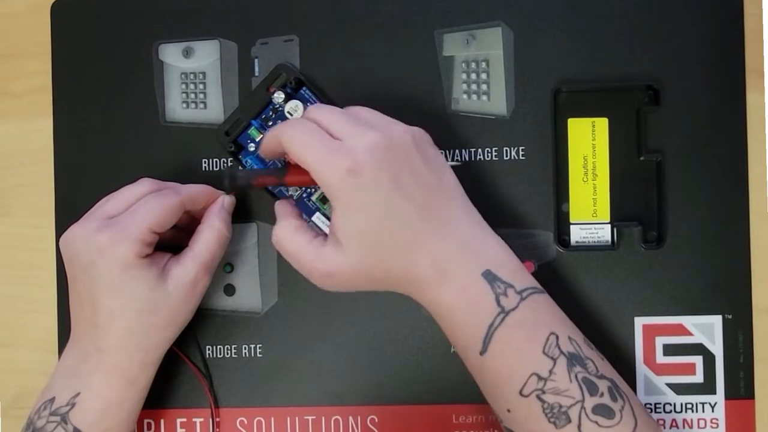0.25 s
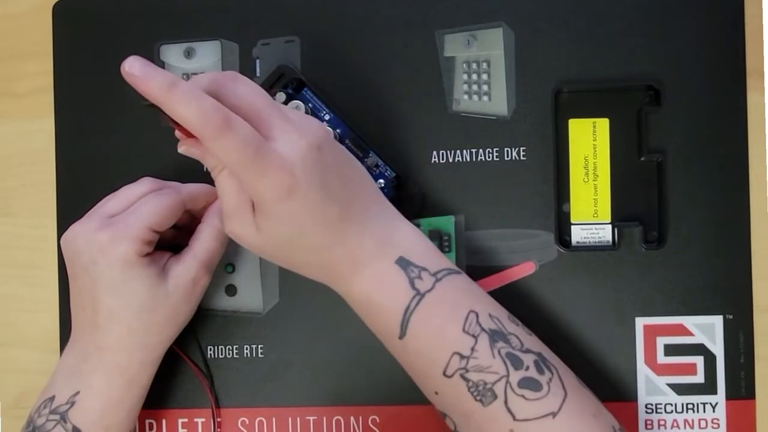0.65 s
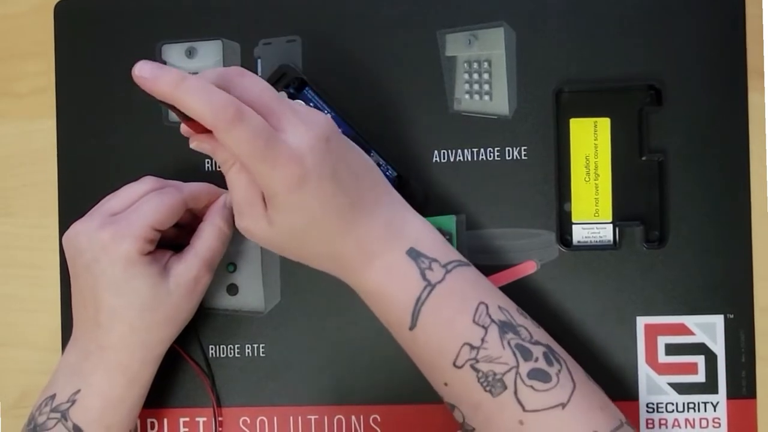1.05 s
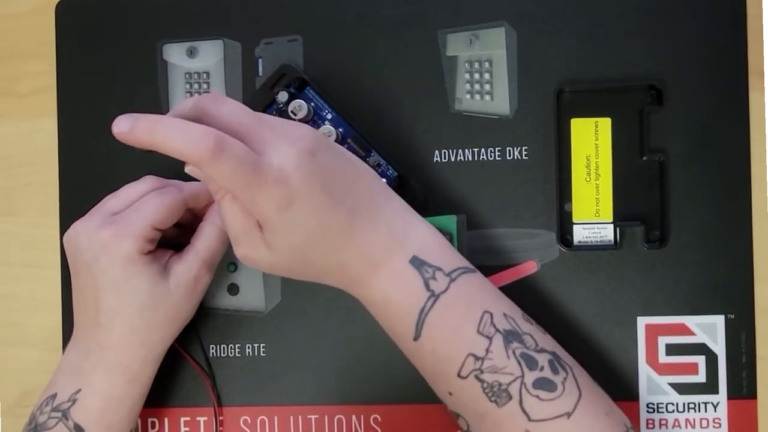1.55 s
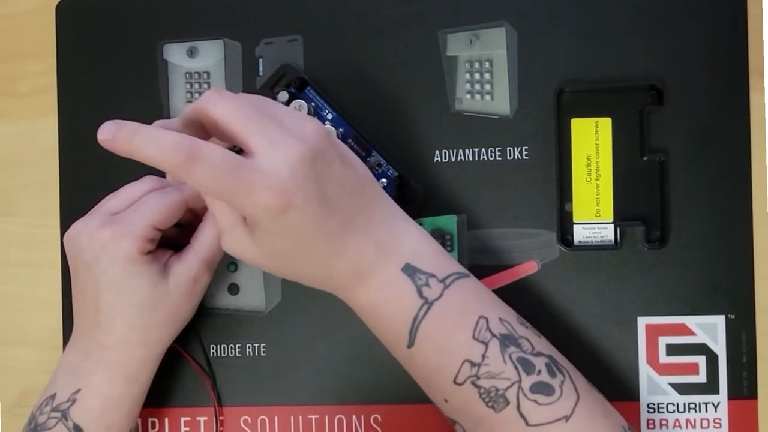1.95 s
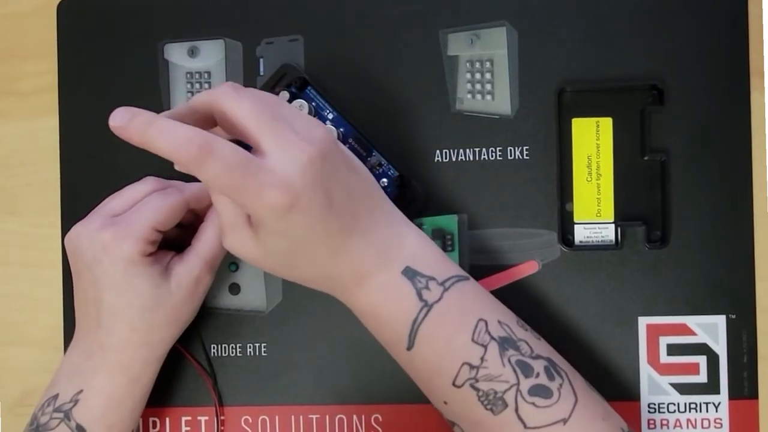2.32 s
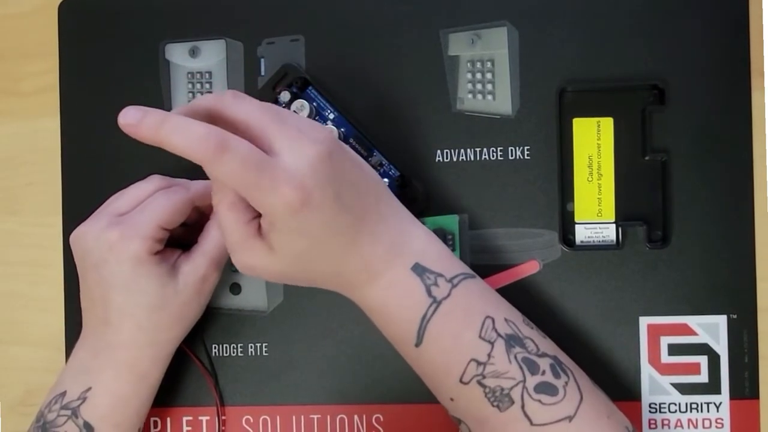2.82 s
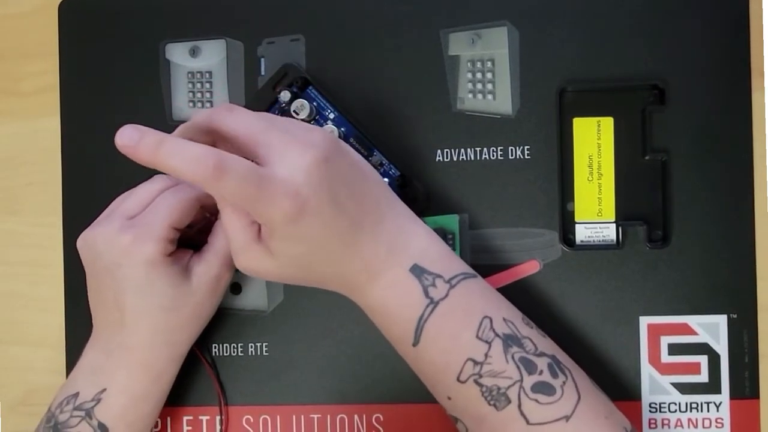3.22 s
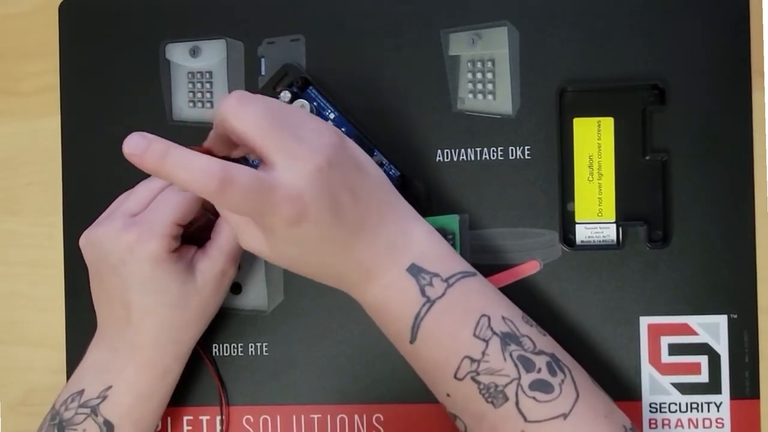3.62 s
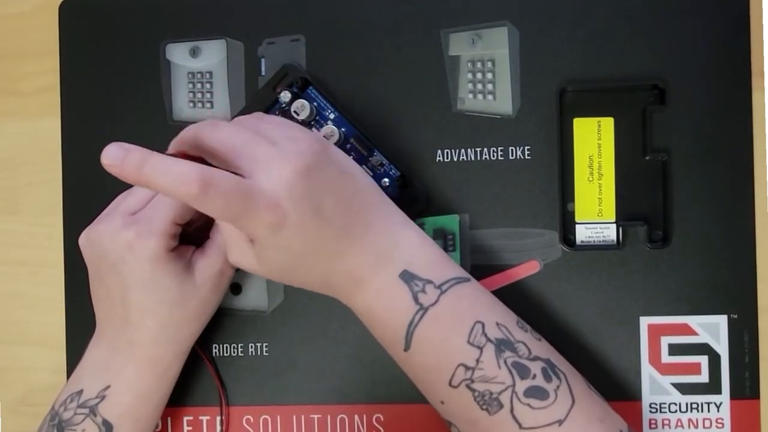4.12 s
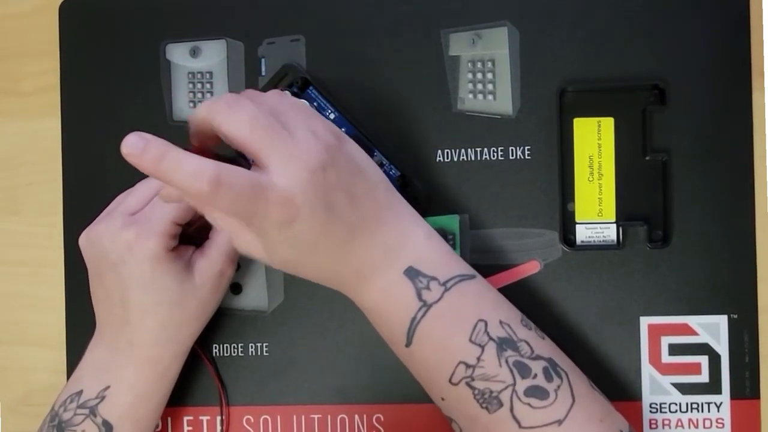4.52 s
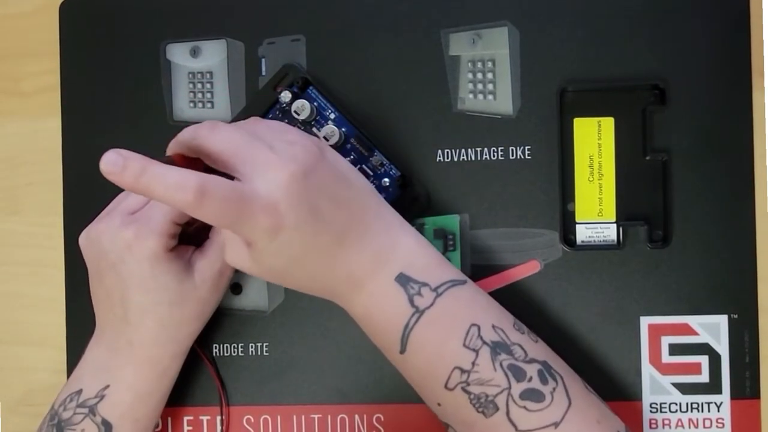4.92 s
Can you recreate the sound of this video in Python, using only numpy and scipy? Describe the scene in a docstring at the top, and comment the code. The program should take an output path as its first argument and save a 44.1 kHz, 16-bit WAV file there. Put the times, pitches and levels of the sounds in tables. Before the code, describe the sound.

Scattered small metallic clicks and short gritty scrapes of a screwdriver working terminal screws, with a low building rumble behind.

```python
"""Screwdriver on a circuit board

A desk in a small room, heard from close by through a pair of microphone ports. A small screwdriver works on the
screw terminals of a board lying on a desk mat: the tip strikes and rings the parts, gritty scrapes come and go,
and the thread squeaks faintly. Behind it are a low building rumble, a distant roar that swells, and a faint
steady hiss."""
import sys
import numpy as np
from scipy import signal
from scipy.fft import rfft, irfft, next_fast_len
from scipy.io import wavfile
from scipy.ndimage import uniform_filter1d

SR = 44100
rng = np.random.default_rng(int(sys.argv[2]) if len(sys.argv) > 2 else 0)


def put_to_file(sound):
    """Save the sound as 16-bit audio at rate SR, in the file named by the first command-line argument."""
    columns = np.atleast_2d(sound).T  # one column per channel
    safe = np.clip(columns, -1, 1)
    whole_steps = np.round(safe * 32767)
    wavfile.write(sys.argv[1], SR, whole_steps.astype(np.int16))


N = 227492


def gain_of(db):
    """Decibels to an amplitude factor."""
    return 10 ** (np.asarray(db) / 20)


def unit_rms(x):
    """Scales a signal to rms 1."""
    return x / np.sqrt(np.mean(x ** 2) + 1e-20)


def at_hz(points, hz):
    """Reads a spectrum table on a log-frequency axis."""
    table_hz, value = np.transpose(points)
    return np.interp(np.log(hz + 1), np.log(table_hz + 1), value)


def at_time(rows, t, column=1):
    """Reads one column of a curve at the times t."""
    rows = np.array(rows)
    return np.interp(t, rows[:, 0], rows[:, column])


def add(mix, start_s, sound):
    """Mixes a two-channel sound in at start_s."""
    part = mix[:, round(start_s * SR):][:, :sound.shape[1]]
    part += sound[:, :part.shape[1]]


def noise_bed(colour, levels, patchy_db, brighten=0., fft_size=1024):
    """Two noises of one colour, with drifting patches, on a level curve; louder may mean brighter."""
    hop = fft_size // 4
    frames, hz = N // hop + 6, np.fft.rfftfreq(fft_size, 1 / SR)
    re_a, im_a, re_b, im_b, patches = rng.standard_normal((frames, len(hz), 5)).T
    patches = unit_rms(uniform_filter1d(uniform_filter1d(patches, size=6, axis=0), size=8, axis=1))
    level_db = at_time(levels, np.arange(frames) * hop / SR)
    tilt_db = brighten * np.log2(hz[:, None] / 300 + 0.081) * (level_db - level_db.max())
    shape = gain_of(at_hz(colour, hz)[:, None] + patchy_db * patches + tilt_db)
    spectra = np.array([re_a + 1j * im_a, re_b + 1j * im_b]) * shape
    noise = signal.istft(spectra, nperseg=fft_size, noverlap=fft_size - hop)[1][:, :N]
    return unit_rms(noise) * gain_of(at_time(levels, np.arange(N) / SR))


def gliding_tone(length_s, from_hz, to_hz, level_db, wobble_hz, bend, fade_share, wobble_samples):
    """A thin tone in the first channel that swells and fades, wavers in pitch and flickers."""
    progress = np.linspace(0, 1, round(length_s * SR))
    wobble, flicker = unit_rms(uniform_filter1d(rng.standard_normal((2, len(progress))), wobble_samples))
    hz = from_hz + (to_hz - from_hz) * progress ** bend + wobble_hz * wobble
    tone = np.sqrt(2) * np.sin(2 * np.pi * np.cumsum(hz) / SR) * gain_of(level_db + 0.45 * flicker)
    return np.array([tone * signal.windows.tukey(len(tone), fade_share), 0 * tone])


def faint_hiss():
    """A faint hiss that slowly rises."""
    # spectrum of the hiss: frequency_hz, density_db
    colour = [(710, -32), (1200, -14.5), (1510, -34), (1650, 0.5), (1980, 2), (2140, 2.5), (2380, -1),
              (3260, -14), (3560, -19.5), (4880, -18.5), (5210, -26.5), (5810, -25.5), (8600, -36.5),
              (13900, -35.5), (16200, -35)]
    # its rise: time_s, level_db
    levels = [(0, -76.5), (2.598, -72.5), (3.4, -70.5), (5.16, -66)]
    return noise_bed(colour, levels, patchy_db=2.3)


def building_drone():
    """A low tone in the building's rumble that throbs and drifts at random."""
    # course of the drone: time_s, level_db, pitch_hz
    course = [(0.0, -57.5, 55.71), (0.57, -53, 58.61), (0.72, -58, 55.6), (1.02, -45, 57.3),
              (1.25, -58, 57.2), (1.44, -52, 52.99), (2.67, -41, 53.16), (2.99, -49, 52.8),
              (3.2, -51, 56.73), (3.27, -41.5, 54.02), (3.78, -49, 52.17), (4.35, -51.5, 52.7),
              (4.61, -47, 56.6), (4.7, -64, 52.24), (4.93, -44, 56.5), (5.16, -68, 55.9)]
    throb_db, throb_s, drift_hz = 5.5, 0.051, 1.2
    t, span = np.arange(N) / SR, round(throb_s * SR)
    throb, drift = unit_rms(uniform_filter1d(uniform_filter1d(rng.standard_normal((2, N)), span), span))
    hz = at_time(course, t, column=2) + drift_hz * drift
    tone = gain_of(throb_db * np.tanh(throb)) * np.sin(2 * np.pi * np.cumsum(hz) / SR)
    tone = unit_rms(tone) * gain_of(at_time(course, t))
    return np.array([tone, .3 * np.roll(tone, 200)])


def building_rumble():
    """Deep, uneven noise from the building around the room."""
    # spectrum of the rumble: frequency_hz, density_db
    colour = [(20, -24.5), (34, -33), (44, -12.5), (55, -4.5), (80, -1), (105, -4), (125, -12.5),
              (145, -17.5), (220, -28), (400, -98.5)]
    # its surges and dips: time_s, level_db
    levels = [(0.0, -47), (0.7, -57), (0.79, -49.5), (1.38, -56), (1.71, -46), (1.84, -54), (2.24, -47),
              (2.36, -59), (2.4, -49), (2.66, -52), (2.69, -47), (5.16, -48)]
    return noise_bed(colour, levels, patchy_db=-0.54, fft_size=4096)


def distant_roar():
    """A far-off roar that brightens a little as it swells, with a few brief tones in it."""
    # spectrum of the roar: frequency_hz, density_db
    colour = [(71, -35.5), (120, -7.5), (189, -7.5), (236, -4), (285, -11.5), (389, -13), (480, -11.5),
              (655, -14), (716, -14.5), (1490, -28), (1700, -42.5), (2210, -56.5), (3740, -120)]
    # its swell: time_s, level_db
    levels = [(0.0, -65.5), (0.57, -66.5), (1.13, -63), (1.35, -64.5), (1.9, -62.5), (2.6, -61.5),
              (3.85, -52), (4.11, -54.5), (5.16, -54.5)]
    # tones in the roar: start_s, length_s, from_hz, to_hz, level_db
    tones = [(3.25, 0.14, 485, 474, -62.5), (3.57, 0.17, 485.5, 486, -55.5),
             (3.78, .25, 233.6, 228.6, -53.5), (3.86, .15, 486, 473, -63), (4.04, 0.088, 485, 470, -61.5),
             (4.25, 0.11, 279.4, 283, -56.5)]
    roar = noise_bed(colour, levels, patchy_db=3.0, brighten=0.024, fft_size=2048)
    for start_s, *glide in tones:
        tone = gliding_tone(*glide, wobble_hz=2.3, bend=1.14, fade_share=0.31, wobble_samples=1500)
        add(roar, start_s, tone)
    return roar


def room_reflections(x):
    """Dense reflections of the small room, each band dying at its own speed."""
    # decay of the room: frequency_hz, t60_s
    decay = [(150, 0.26), (500, 0.28), (2000, 0.17), (6000, 0.17), (14000, 0.15)]
    taps = rng.standard_normal((2, SR // 2))
    taps[:, :150] = 0  # the gap before the first reflection
    hz, t, spectra = signal.stft(taps, SR, nperseg=256)
    tail = signal.istft(spectra * gain_of(-60 * t / at_hz(decay, hz)[:, None]), SR, nperseg=256)[1]
    return signal.fftconvolve(x, tail / np.linalg.norm(tail[0]), axes=1)[:, :N]


def thread_squeak(*glide):
    """The screw thread squeaks faintly as it turns."""
    return gliding_tone(*glide, wobble_hz=170., bend=2.2, fade_share=.5, wobble_samples=150)


def grit_swell(t, level_db, width_s, tilt_db_per_octave):
    """A short swell of gritty hiss around t = 0: alone a scrape, around a click a soft haze."""
    # spectrum of the grit: frequency_hz, density_db
    colour = [(700, -40.5), (1500, -3), (2200, 1), (3300, 6.5), (4800, -4), (5800, -10.5), (7100, -4),
              (8400, -17.5), (10500, -27), (12500, -27.5), (16000, -28)]
    grit = rng.standard_normal((2, len(t))) * gain_of(3.0 * np.minimum(rng.exponential(1, len(t)), 5))
    hz = np.fft.rfftfreq(len(t), 1 / SR)
    colour_db = at_hz(colour, hz) + tilt_db_per_octave * np.log2(hz / 6000 + 0.01)
    grit = irfft(rfft(grit) * gain_of(colour_db), len(t))
    flutter = gain_of(1.9 * unit_rms(uniform_filter1d(rng.standard_normal(len(t)), size=120)))
    return gain_of(level_db) * unit_rms(grit) * flutter / np.cosh(t / width_s) ** 2


def ring(modes):
    """A struck part rings: each mode is a close pair, and each blow favours other modes."""
    t, scatter = np.arange(3500) / SR, rng.standard_normal((2 * len(modes), 2))
    ringing = sum(gain_of(db + 1.5 * favour - 60 * t / t60)
                  * np.sin(2 * np.pi * hz * (1 + .008 * detune) * t)
                  for (hz, db, t60), (favour, detune) in zip(modes + modes, scatter))
    middle_hz = modes[len(modes) // 2][0]
    return ringing * (1 - np.exp(-1.2 * t * middle_hz)) ** 3  # a soft contact builds over about a cycle


def tip_click(chatter_s, housing_db, *relative_dbs):
    """The tip chatters through quick contacts, strongest near chatter_s, that ring all under it."""
    # modes of the parts that ring: pitch_hz, level_db, t60_s
    housing = [(1310, -4, .025), (1430, -7, .02), (1560, -6, .018), (1860, -5, .016), (2030, 3, .022),
               (2200, 1, .02), (2320, -6, .018), (2490, -11, .015)]
    desk = [(120, -16, .06), (190, -12, .06), (237, -5, .07), (287, 0, .08), (316, -2, .08),
            (400, -12, .04), (485, -11, .05)]
    board = [(596, -6, 0.023), (749, -2, 0.021), (880, 0.5, 0.022), (1030, -4.5, 0.03), (1160, -5.5, 0.024)]
    terminal = [(2670, 2, 0.0061), (3237, -11.5, 0.026), (3634, -9, 0.0083)]
    screw = [(4000, 0, .007), (4400, -1, .007), (4850, -2, .007), (5400, -4, .006)]
    blade = [(6140, -2.5, 0.0046), (6790, 2, .006), (7264, 0.5, 0.01018), (7830, -2, 0.00612),
             (8320, -9.5, .005), (9430, -6.5, .009)]
    tip = [(11900, 0, .002), (12700, -1, .002), (13600, -1, .002), (14500, 0, .002), (15300, -2, .002)]
    softness = 1.8  # how gently the contacts build up
    age = np.arange(1500) / SR / chatter_s
    swell = age ** softness / (1 + age ** softness) * np.exp(-age)
    contacts = swell * rng.standard_normal((2, len(age))) * gain_of(2.5 * rng.exponential(1, len(age)))
    blow = 0
    for modes, part_db in zip((housing, desk, board, terminal, screw, blade, tip), (0, *relative_dbs)):
        part = signal.fftconvolve(contacts, ring(modes)[None], axes=1)
        loudest_rms = np.sqrt(uniform_filter1d((part ** 2).mean(0), size=220).max())
        blow = blow + gain_of(part_db) * part / loudest_rms
    # a narrow dip near 11 kHz hollows the treble of each click
    dip_hz, dip_width_hz, dip_db = 10870, 800, -12
    hz = np.fft.rfftfreq(blow.shape[1], 1 / SR)
    notch_db = dip_db * np.exp(-((hz - dip_hz) / dip_width_hz) ** 2)
    return irfft(rfft(blow) * gain_of(housing_db + notch_db), blow.shape[1])


def screwdriver():
    """The tool at work on the terminals, close up: clicks, scrapes and squeaks."""
    # blows of the tip: time_s, housing_db, then relative to the housing:
    # desk_db, board_db, terminal_db, screw_db, blade_db, tip_db
    blows = [(0.2988, -52.5, -24, -21, -10.5, -49, -30, -57), (0.4519, -67.5, -25, -8, 3, 9.5, -21, -31),
             (0.9188, -33.5, -32.5, -1, -3, -17.5, -24.5, -36),
             (1.0316, -40.5, -41, -2, -4, -12.5, -26, -46), (1.1371, -46.5, -10, -21, -17, -22, -28, -38),
             (1.1484, -36, -15.5, -11, -20, -12.5, -22, -44),
             (1.16, -48.5, -17.5, -5.5, -14, -26, -27, -38), (1.3213, -58.5, -6, -17, -5, -29, -33, -41),
             (1.4291, -53.5, -11.5, 2, -10, -18, -20, -20), (1.4512, -42.5, -7, -4.5, -17.5, -12, -36, -24),
             (1.679, -32, -8.5, -12.5, -5, -4.5, -13.5, -17),
             (1.6835, -26.5, -6, -9, -0.5, -24.5, -9.5, -16),
             (1.9916, -67.5, -7, -14, 8.5, -15, -22, -30.5),
             (2.3211, -46, -14, -13.5, -37, -22.5, -43, -50), (2.354, -54, -19, -16, -22, -5.5, -21, -26),
             (2.7634, -57, -13.5, -13, 0.5, -16, -23, -16), (2.818, -61, -20, -6.5, 3, -6, -5.5, -4.5),
             (3.3756, -57.5, -14, 2, -16.5, 2, -11, 8.5), (4.0437, -58.5, -8.5, 3, 3, -15, -11, -29),
             (4.5563, -43, -14, -8.5, -1.5, -11.5, -14.5, -17), (4.5762, -57, -26, -5, -1, -12, -21, -21)]
    # swells of gritty hiss: middle_s, level_db, width_s, tilt_db_per_octave
    swells = [(0.301, -73, 0.016, 2), (0.466, -67, 0.031, -0.5), (0.533, -71.5, 0.045, 6),
              (0.923, -49, 0.016, 1), (1.037, -60, 0.013, 2), (1.156, -53, 0.018, 4),
              (1.452, -51.5, 0.018, 5.5), (1.71, -52.5, 0.027, 0.5), (1.992, -62, 0.014, 3),
              (2.356, -65, 0.018, 3), (2.76, -68, 0.025, 3.5), (2.822, -69, 0.023, 5),
              (2.954, -84.5, 0.019, 8), (3.327, -74, 0.016, 5), (3.38, -57.5, 0.014, 4.5),
              (3.743, -80, 0.051, 7), (4.031, -69, 0.029, 7.5), (4.303, -65.5, 0.024, 8),
              (4.555, -58, 0.02, 7), (4.82, -71, 0.028, 6.5), (5.104, -74.5, 0.03, 5)]
    # squeaks of the thread: start_s, length_s, from_hz, to_hz, level_db
    squeaks = [(2.54, 0.26, 14400, 14200, -103), (2.752, .16, 14800, 14400, -86),
               (4.44, .11, 14750, 15300, -89.5), (4.595, .05, 15300, 14500, -85),
               (4.64, .09, 14500, 14600, -96), (4.806, .15, 14750, 12500, -97)]
    chatter_s, swell_t = .0026, np.arange(-8192, 8192) / SR
    tool = np.zeros((2, N))
    for time_s, *blow in blows:
        add(tool, time_s - chatter_s, tip_click(chatter_s, *blow))
    for middle_s, *swell in swells:
        add(tool, middle_s + swell_t[0], grit_swell(swell_t, *swell))
    for start_s, *glide in squeaks:
        add(tool, start_s, thread_squeak(*glide))
    return tool


def microphone_ports(x):
    """Two unrelated channels become a close port pair: partly alike, the right one turned in phase."""
    # how alike the ports sound: frequency_hz, likeness (0 to 1)
    likeness = [(30, 1), (130, 0.91), (300, 0.71), (600, 0.52), (1200, 0.22), (2500, 0.59), (5000, 0.1),
                (9000, 0.95)]
    # their balance: frequency_hz, left_minus_right_db
    balance = [(60, 0.5), (110, -1.5), (200, 1), (380, 0.5), (700, -3), (1290, 0), (2380, -3), (4400, 1),
               (8120, 0), (15000, 0)]
    # their phase: frequency_hz, left_lead_rad
    phase = [(0, 0), (300, .1), (520, .7), (860, 2.8), (1640, 2.8), (2200, 1.1), (2800, 3.7), (3300, 3),
             (3750, 1), (4200, 4.4), (4900, 6.2), (16000, 6.3)]
    pad = 4096
    size = next_fast_len(N + 2 * pad)
    padded = np.pad(x, ((0, 0), (pad, size - N - pad)), "reflect")
    hz = np.fft.rfftfreq(size, 1 / SR)
    common, separate = rfft(padded * signal.windows.tukey(size, pad / size))
    alike, lean = at_hz(likeness, hz), gain_of(at_hz(balance, hz) / 2)
    turn = np.exp(-1j * np.interp(hz, *np.transpose(phase)))
    right = turn * (alike * common + np.sqrt(1 - alike ** 2) * separate)
    return irfft([common * lean, right / lean], size)[:, pad:pad + N]


def scene():
    """The tool and its reflections over the room's background, as they reach the microphone."""
    tool = screwdriver()
    background = building_rumble() + building_drone() + distant_roar() + faint_hiss()
    return microphone_ports(background + tool + gain_of(-7.5) * room_reflections(tool))


def record(dry):
    """The recorder cuts off the highest treble steeply."""
    edge_hz = 15800
    lowpass = signal.firwin(511, edge_hz, window=("kaiser", 9), fs=SR)
    padded = np.pad(dry, ((0, 0), (255, 255)), "reflect")
    return signal.oaconvolve(padded, lowpass[None], "valid")


dry = scene()
out = record(dry)
put_to_file(out)
```